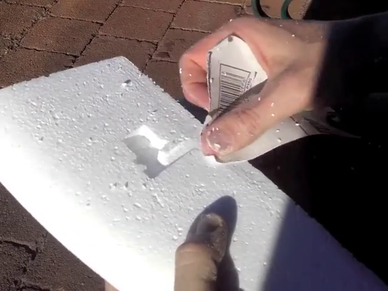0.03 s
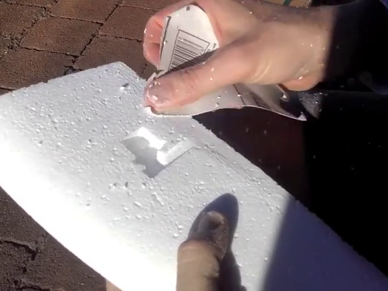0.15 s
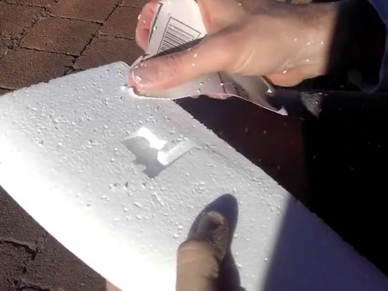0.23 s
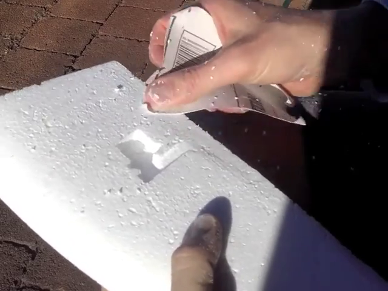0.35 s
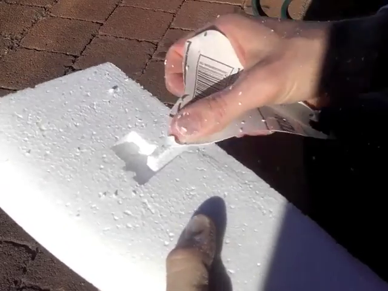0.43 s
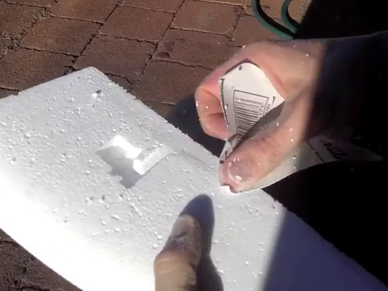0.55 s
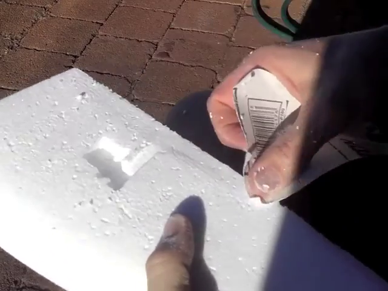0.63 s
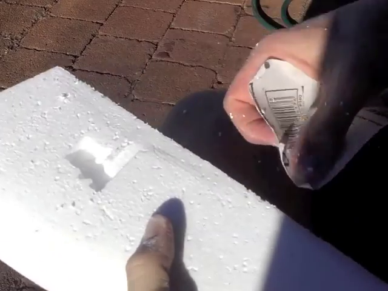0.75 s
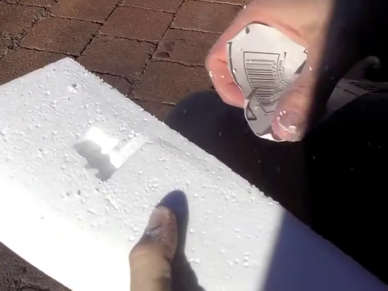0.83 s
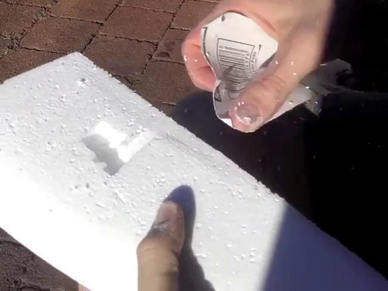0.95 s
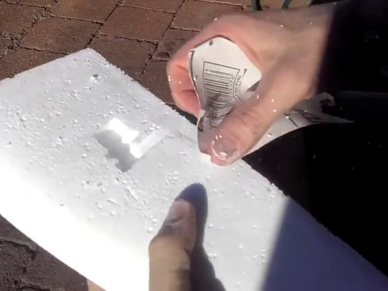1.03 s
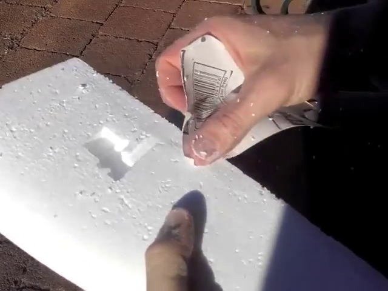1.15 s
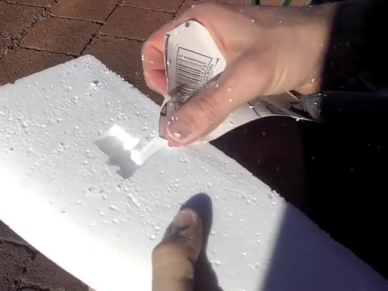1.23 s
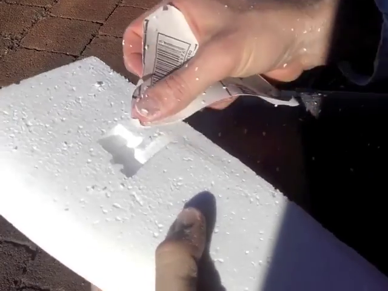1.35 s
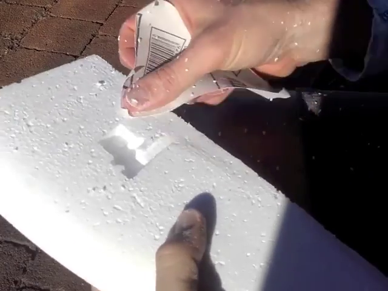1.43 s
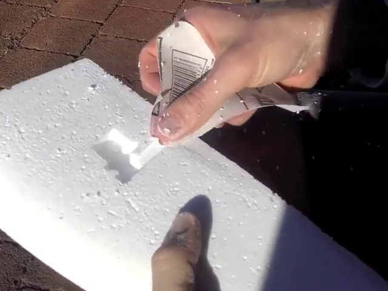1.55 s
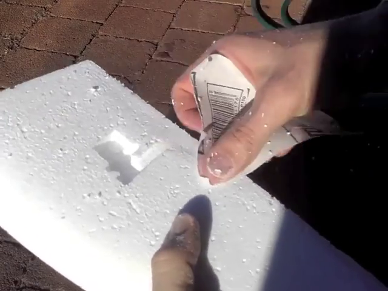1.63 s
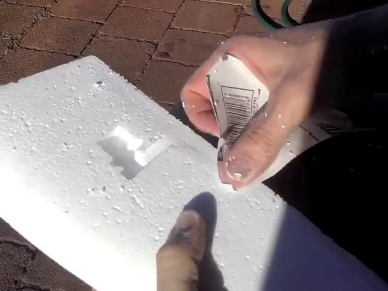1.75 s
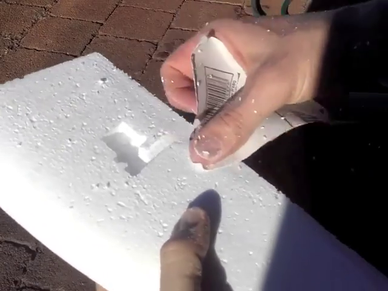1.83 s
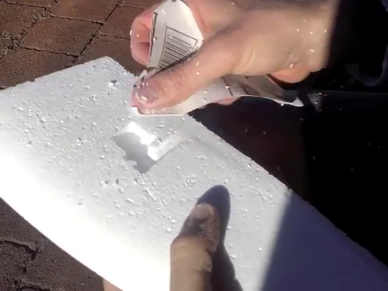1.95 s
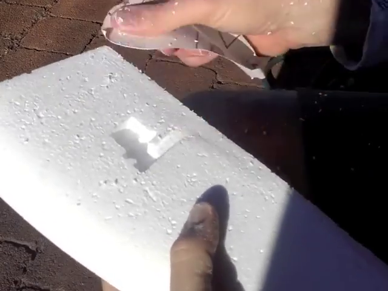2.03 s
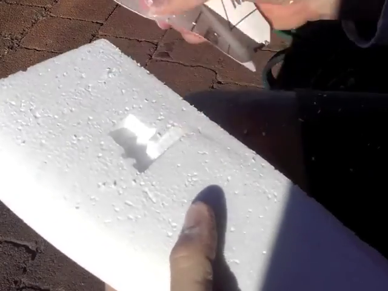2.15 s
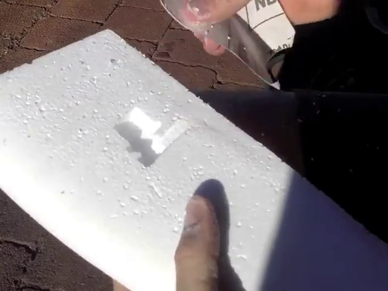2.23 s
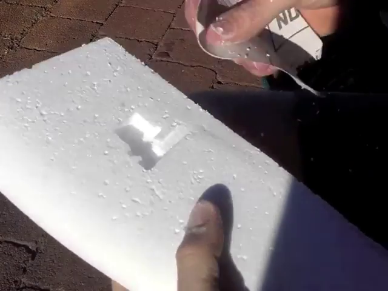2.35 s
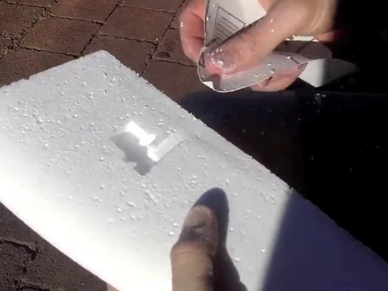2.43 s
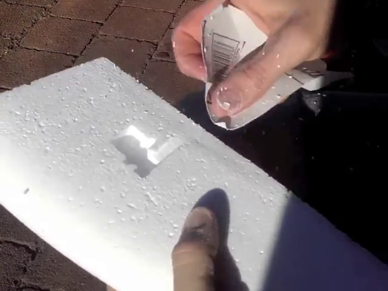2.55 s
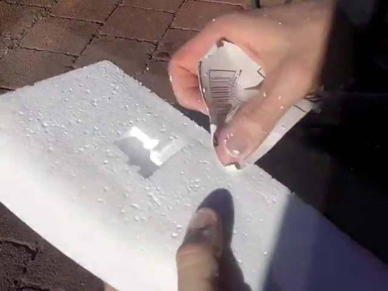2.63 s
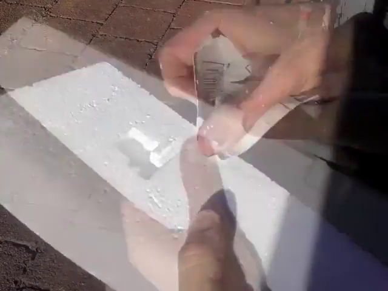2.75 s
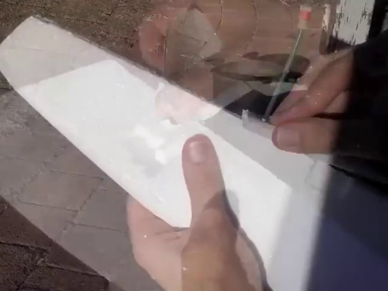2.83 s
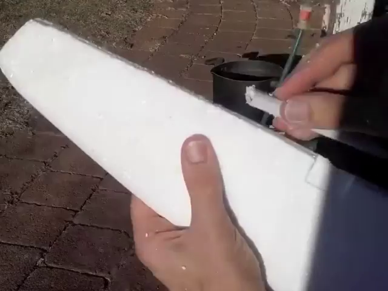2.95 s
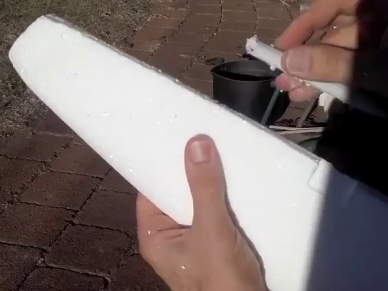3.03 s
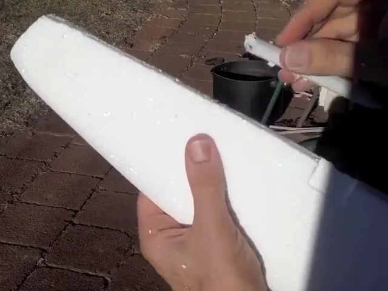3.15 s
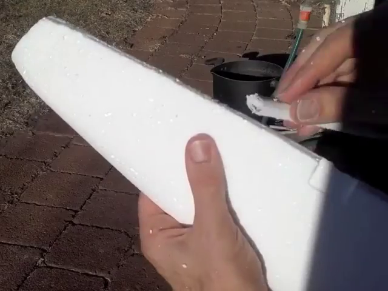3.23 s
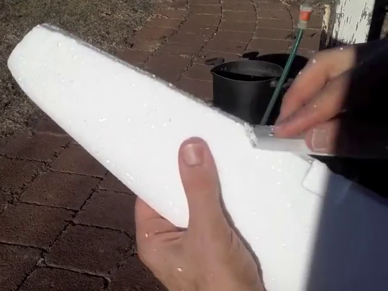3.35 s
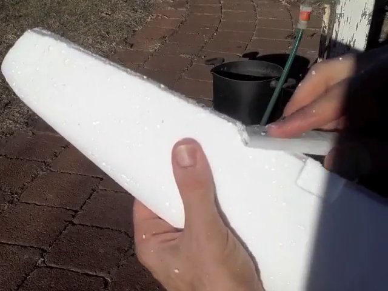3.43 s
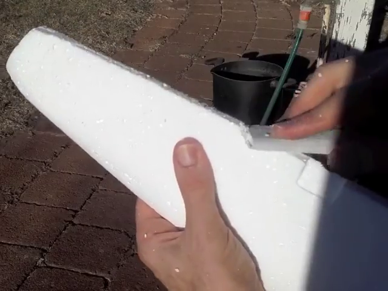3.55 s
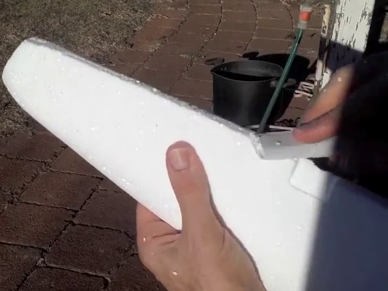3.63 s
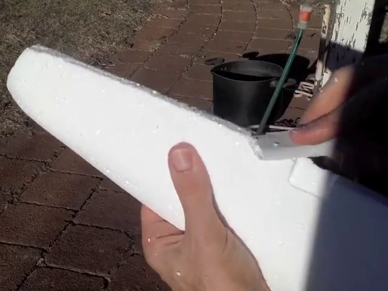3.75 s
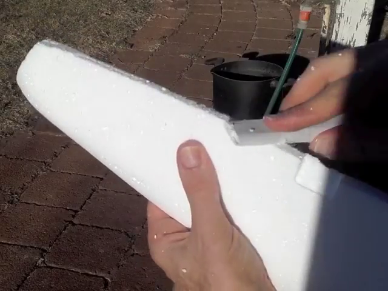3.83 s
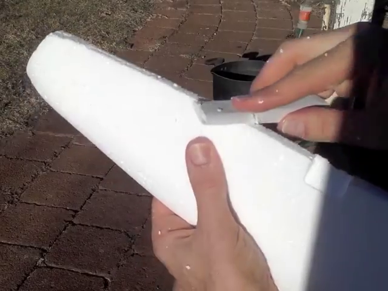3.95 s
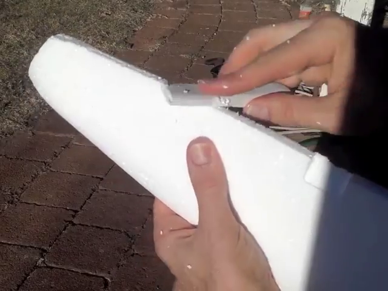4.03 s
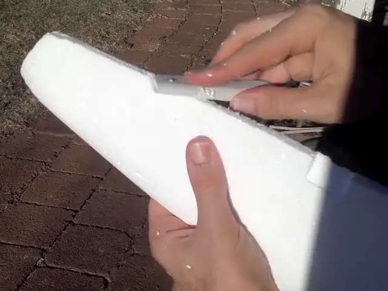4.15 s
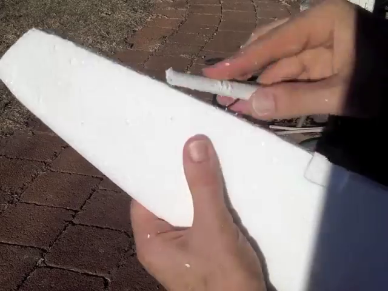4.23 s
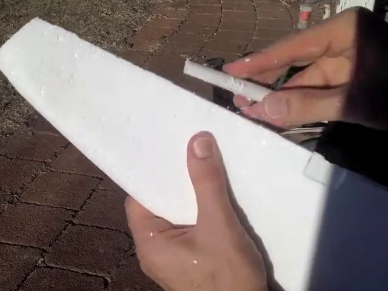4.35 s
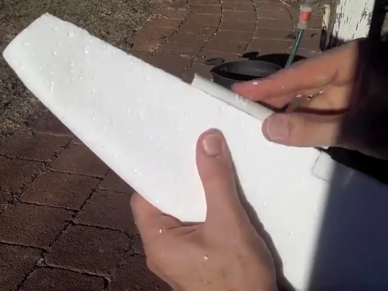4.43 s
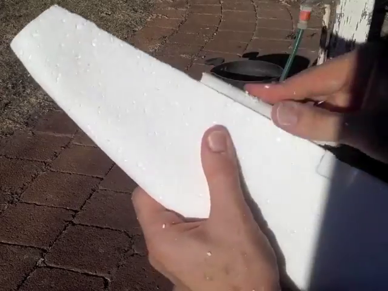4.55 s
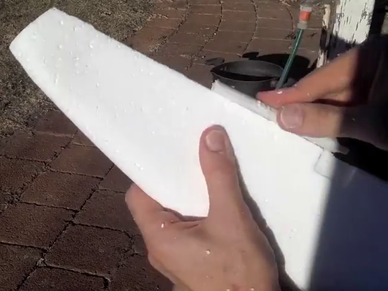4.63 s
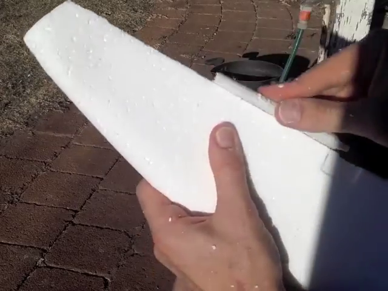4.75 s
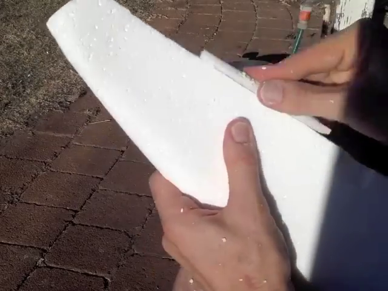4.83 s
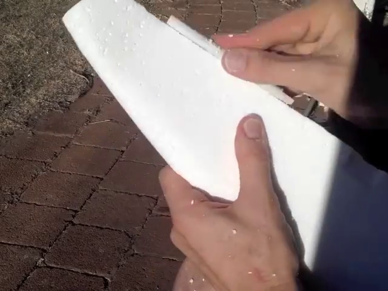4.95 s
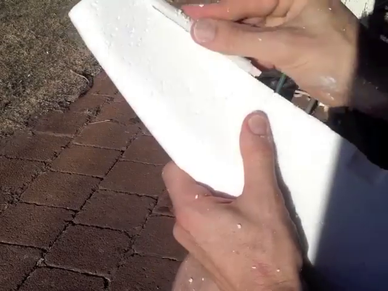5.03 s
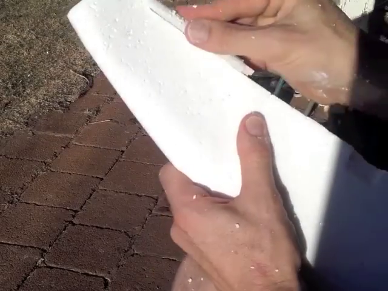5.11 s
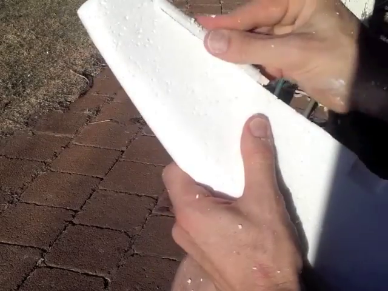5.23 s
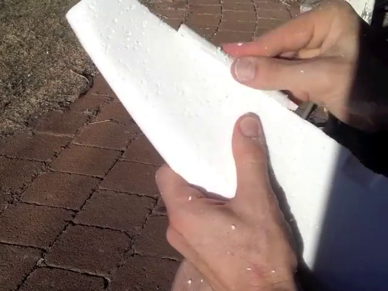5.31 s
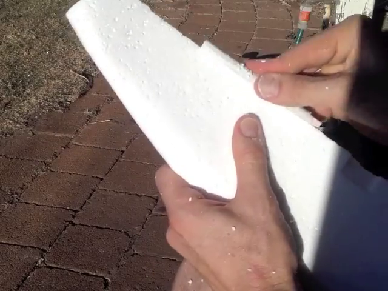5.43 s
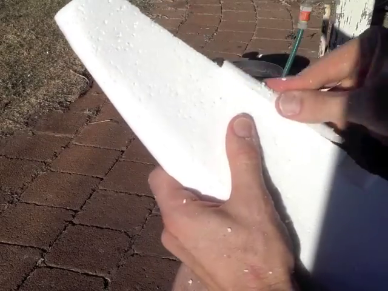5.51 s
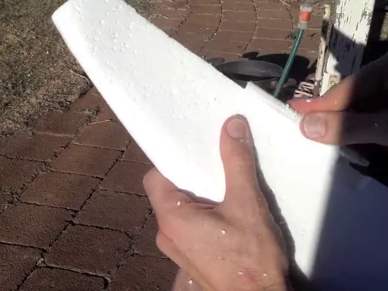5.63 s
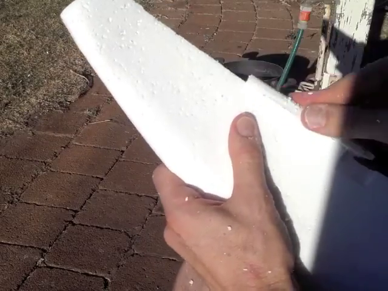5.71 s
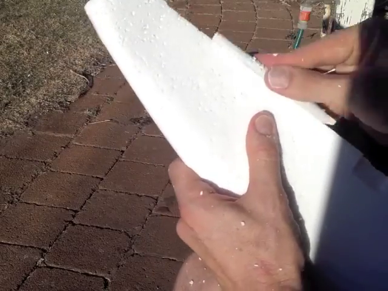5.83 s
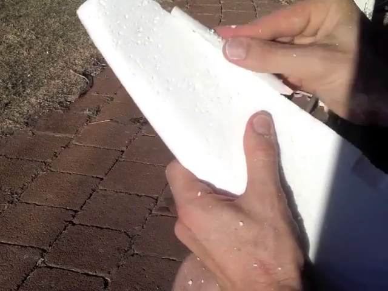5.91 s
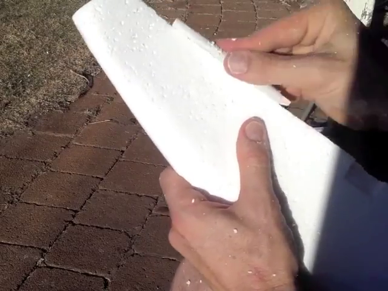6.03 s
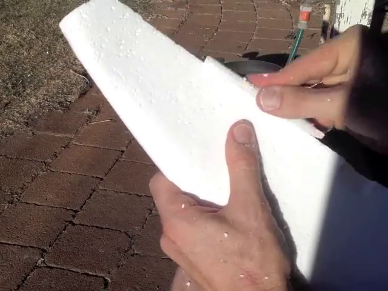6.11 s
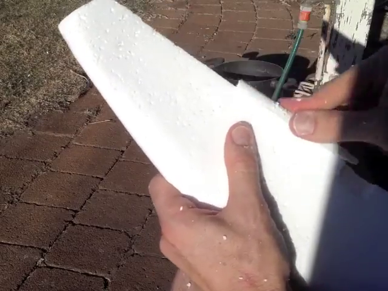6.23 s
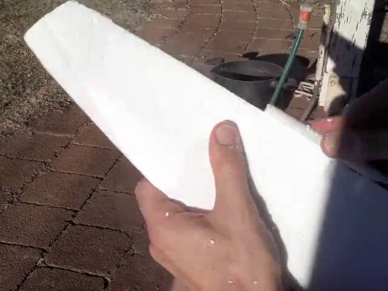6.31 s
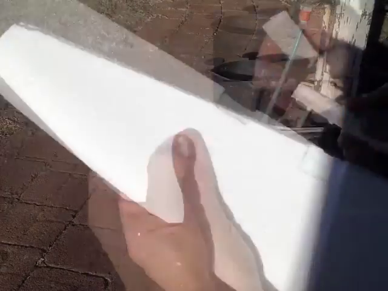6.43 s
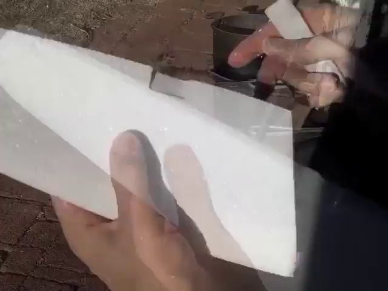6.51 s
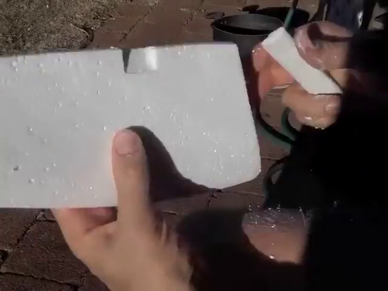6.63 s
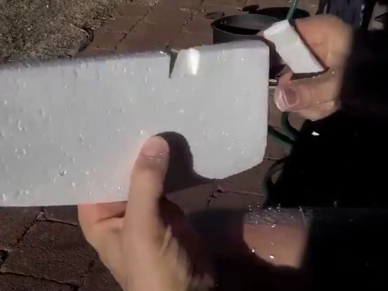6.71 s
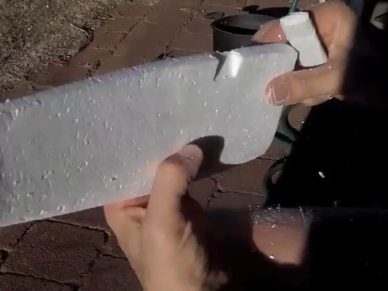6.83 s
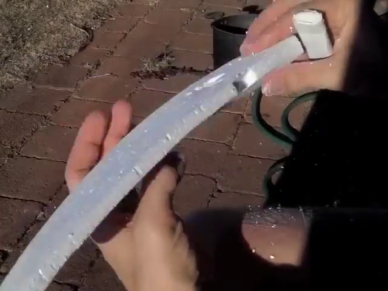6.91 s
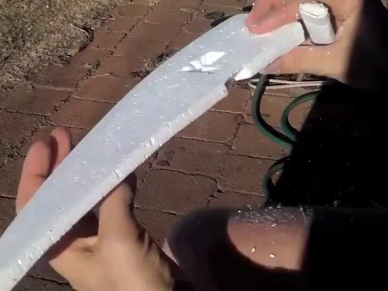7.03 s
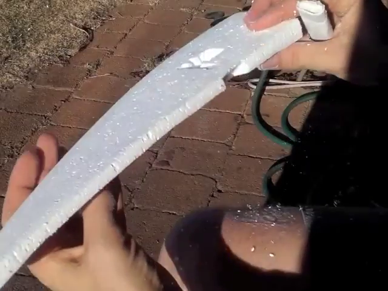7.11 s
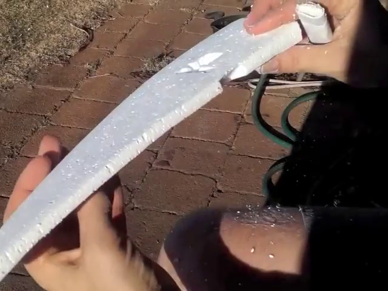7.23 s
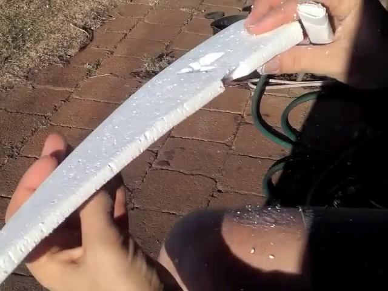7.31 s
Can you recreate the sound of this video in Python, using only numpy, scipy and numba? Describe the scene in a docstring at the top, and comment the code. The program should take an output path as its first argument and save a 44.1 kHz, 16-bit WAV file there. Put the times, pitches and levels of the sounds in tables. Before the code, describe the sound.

Close, dry outdoor hand-sanding of foam: bright gritty swishes, brief pauses with papery rustles, a sharp crack, steady edge rasps, then faint handling bumps.

```python
"""Hand-sanding a foam model wing

Close and dry outdoors: a fingertip wrapped in paper, then a paper roll dabbing near the wing root and
stroking along the edge. Each rasp is coloured noise with a peak that follows hand speed, through fixed
resonances and shifting echoes. Softer noise and crease ticks make the brushing; low resonant noise is
the wing's rumble, decaying sines are its bumps, sharp cracks are snagged grit; faint noise is the air."""
import sys
import numpy as np
from scipy import signal
from scipy.fft import rfft, irfft, next_fast_len
from scipy.io import wavfile
from scipy.ndimage import uniform_filter1d
from numba import njit

SR = 44100
rng = np.random.default_rng(int(sys.argv[2]) if len(sys.argv) > 2 else 0)


def dump(signal):
    """Clip the signal to [-1, 1] and save it as 16-bit WAV at the path in sys.argv[1]."""
    limited = np.clip(np.atleast_2d(signal).T, -1, 1)
    pcm = np.round(limited * 32767).astype(np.int16)
    wavfile.write(sys.argv[1], SR, pcm)


N = 325325


def from_db(db):
    """Decibels to gain."""
    return 10 ** (np.asarray(db) / 20)


def rms(x):
    """Root mean square."""
    return np.sqrt(np.mean(x ** 2) + 1e-20)


def cut(x, hz, kind, order=4):
    """Butterworth filter."""
    return signal.sosfilt(signal.butter(order, hz, kind, fs=SR, output="sos"), x)


def noise(spectrum):
    """Noise with a given colour, rms 1."""
    hz, level_db = np.transpose(spectrum)
    size = next_fast_len(N)
    bins = np.maximum(np.fft.rfftfreq(size, 1 / SR), 1)
    colour = from_db(np.interp(np.log(bins), np.log(hz), level_db))
    white = rng.standard_normal(size)
    coloured = irfft(rfft(white) * colour, size)[:N]
    return coloured / rms(coloured)


def drift(rate_hz):
    """Slow random wander below a given rate, rms 1."""
    slow = cut(rng.standard_normal(N + SR), rate_hz, "low", order=2)[SR:]   # skip the filter's start
    return slow / rms(slow)


def evened(x):
    """The same sound with its slow level held at 1."""
    power = np.abs(uniform_filter1d(x ** 2, size=1500))
    return x / np.sqrt(power + 1e-12)


def resonate(x, modes):
    """A chain of resonant peaks and antiresonant notches."""
    sections = []
    for hz, width_hz, level_db in modes:
        w = 2 * np.pi * hz / SR
        height = from_db(level_db / 2)
        damping = np.tan(np.pi * width_hz / SR)
        b = np.array([1 + damping * height, -2 * np.cos(w), 1 - damping * height])
        a = np.array([1 + damping / height, -2 * np.cos(w), 1 - damping / height])
        sections.append(np.r_[b, a] / a[0])
    return signal.sosfilt(sections, x)


@njit
def moving_band(x, slope, damping):
    """State-variable band-pass with gain 1 at a moving centre; slope = tan(pi Hz / SR)."""
    out, band, low = np.zeros(len(x)), 0.0, 0.0
    for i in range(len(x)):
        g = slope[i]
        v = (band + g * (x[i] - low)) / (1 + g * (g + damping))
        band, low = 2 * v - band, low + 2 * g * v
        out[i] = damping * v
    return out


def ring(clicks, hz, t60):
    """A unit click sets a sine ringing that starts near height 1 and falls 60 dB in t60 seconds."""
    r = from_db(-60 / (t60 * SR))
    w = 2 * np.pi * hz / SR
    return signal.lfilter([0, np.sin(w)], [1, -2 * r * np.cos(w), r * r], clicks + 1e-18)


def strikes(rows, scatter_db):
    """One click for each (time, level) row, each a little stronger or weaker."""
    s, level_db = np.transpose(rows)
    clicks = np.zeros(N)
    clicks[np.round(s * SR).astype(int)] = from_db(level_db + scatter_db * rng.standard_normal(len(s)))
    return clicks


def envelope(start, end, attack, release):
    """Smooth attack, hold and release of one contact (0-1)."""
    t = np.arange(N) / SR
    ramp = np.clip(np.minimum((t - start) / attack, (end - t) / release), 0, 1)
    return ramp * ramp * (3 - 2 * ramp)


def blend(contacts):
    """Contacts (gain, controls..) add in power; where they overlap the stronger one dominates the controls."""
    gains, *controls = [np.array(column) for column in zip(*contacts)]
    power = gains ** 2
    weights = power + 1e-20
    blended = [(weights * control).sum(0) / weights.sum(0) for control in controls]
    return [np.sqrt(power.sum(0))] + blended


def with_hiss(friction, hiss_db, split_hz=6000):
    """Friction at level 1 below the split, with the hiss above it set on its own."""
    body = evened(cut(friction, split_hz, "low", order=5))
    hiss = evened(cut(friction, split_hz, "high", order=5))
    return body + from_db(hiss_db) * hiss


# Still outdoor air, relative spectrum: (frequency [Hz], level [dB])
AIR_COLOUR = [(18, -29), (30, 1), (49, -18), (66, -31.5), (152, -1.5), (1140, -7.5), (1640, -20),
              (1820, -8), (2760, -19.5), (15500, -28.5)]
AIR_DB = -67


def still_air():
    """A steady bed of coloured noise stands for the quiet outdoor air."""
    return from_db(AIR_DB) * noise(AIR_COLOUR)


RUMBLE_PER_RASP = .3   # dB of wing rumble for each dB of rasp


def shaking(rasp, coupling_db):
    """How hard a run of strokes shakes the wing: it grows far more slowly than the rasp."""
    return from_db(coupling_db) * rasp ** RUMBLE_PER_RASP


# Rumble from the hand that holds and turns the wing, before trim: (time [s], level [dB])
HOLDING = [(0, -57.5), (.8, -58), (1.0, -62), (2.55, -56.5), (3.05, -68), (3.55, -65.5), (4.4, -63.5),
           (5.2, -57), (5.75, -53), (6.5, -59), (6.95, -52.5), (7.17, -58), (7.38, -54.5)]
# Colour of the wing's rumble, relative: (frequency [Hz], level [dB])
WING_COLOUR = [(45, -34), (64, -18.5), (100, -15), (140, -7.5), (180, -5), (250, -4.5), (330, -5),
               (500, -2.5), (890, -2), (1590, -8.5), (2250, -16), (3400, -20.5), (6000, -28), (12000, -31)]
# Lowest bending resonances of the held wing: (frequency [Hz], width [Hz], gain [dB])
WING_BENDING = [(176.5, 17, 0), (215, 20, 3.5)]


def handling(drives, lumpy_db=1.77, trim_db=-1.44):
    """Holding and rubbing set the whole light wing rumbling, their drives adding in power."""
    holding_s, holding_db = np.transpose(HOLDING)
    holding = from_db(np.interp(np.arange(N) / SR, holding_s, holding_db))
    level = np.sqrt(holding ** 2 + sum(drive ** 2 for drive in drives))
    rumble = resonate(noise(WING_COLOUR), WING_BENDING)
    rumble = rumble / rms(cut(rumble, [100, 700], "band"))
    return level * from_db(trim_db + lumpy_db * drift(45)) * rumble


# Fingers bumping the wing, strength before random scatter: (time [s], level [dB])
BUMPS = [(1.105, -37.5), (2.143, -44), (2.217, -56), (6.675, -43), (6.853, -56), (6.875, -30.5),
         (7.038, -38)]
# What the bumped wing rings with: (frequency [Hz], relative level [dB], 60 dB decay [s])
WING_MODES = [(194, -7, 0.055), (270, -13, 0.087), (420, -9, .04), (700, -7, 0.037), (1060, -4.5, 0.024),
              (1410, -12, 0.013), (2120, -4.5, 0.01)]


def bumps():
    """Each touch strikes every mode of the wing with a strength of its own."""
    knocks = 0
    for hz, level_db, t60 in WING_MODES:
        knocks = knocks + from_db(level_db) * ring(strikes(BUMPS, scatter_db=3.5), hz, t60)
    return cut(knocks, 200, "high", order=2)   # small light things radiate little bass


# Grit snagging and paper ticking, click strength before scatter and filters: (time [s], level [dB])
SNAPS = [(1.1065, -38), (1.216, -27), (1.871, -24), (4.0794, -9.5), (6.676, -37), (6.768, -31)]


def snaps():
    """A snagged grain lets go with one sharp crack and a few milliseconds of splintering."""
    clicks = strikes(SNAPS, scatter_db=.3)
    crack = -1.5 * ring(clicks, 8000, .0004)
    t = np.arange(SR // 30) / SR
    decay = from_db(-16 - 60 * t / .009)   # 60 dB down in 9 ms
    splinters = cut(rng.standard_normal(len(t)), 2500, "high", order=1) * decay
    snap = crack + signal.fftconvolve(clicks, splinters)[:N]
    return cut(snap, 700, "high", order=2)   # little bass here either


# Delays of the reflections between paper, hand and wing: (delay [s])
HAND_ECHOES = [.0007, .0011, .0016, .0023, .0031, .0042, .0056]
LOOSE_FLEX, ROLL_FLEX = .17, .11   # echo depth (0-1): loosely held paper, firmly pressed roll


def shifting_echoes(x, depth):
    """Close reflections come and go as the hand travels and the paper flexes, so peaks wander."""
    out = x.copy()
    for delay_s in HAND_ECHOES:
        out += depth * drift(6) * np.roll(x, round(delay_s * SR))
    return out


# What a crease rings with: (frequency [Hz], 60 dB decay [s])
CREASE_MODES = [(1170, 0.0058), (1930, 0.0036), (3000, 0.0024), (4600, 0.0022)]
CREASES_PER_S, CREASE_SPREAD_DB = 90, 8   # mean rate, spread of sizes


def creases():
    """Flexing paper ticks sparsely: random clicks of mixed size ring short modes, rms 1."""
    size_db = CREASE_SPREAD_DB * np.minimum(rng.exponential(1, N), 3)
    sizes = from_db(size_db) * rng.choice([-1, 1], N)
    clicks = sizes * (rng.random(N) < CREASES_PER_S / SR)
    ticks = sum((-1) ** k * ring(clicks, hz, t60) for k, (hz, t60) in enumerate(CREASE_MODES))
    return ticks / rms(ticks)


# Loose paper and skin brushing lightly, levels before trim:
# (start [s], end [s], swish [dB], hiss relative to swish [dB], wing rumble [dB])
BRUSHES = [(.797, 0.828, -52.5, -13, -58), (1.099, 1.162, -55, -16, -51), (2.079, 2.135, -57, -20, -48.5),
           (2.127, 2.171, -50, -11, -50), (2.2, 2.251, -48, -10, -50), (2.238, 2.484, -47.5, -13.5, -49.5),
           (2.454, 2.53, -47, -11, -54), (2.629, 2.75, -51, -3, -61), (3.028, 3.093, -54.5, -9, -73),
           (6.528, 6.595, -54, -3, -61), (6.761, 6.792, -45.5, 0.5, -47.5), (6.824, 6.881, -45, -6, -52),
           (6.867, 6.903, -44, -12, -51), (6.9, 6.968, -58, -6, -58), (6.949, 7.056, -51, -5.5, -52),
           (7.051, 7.103, -49.5, -7, -52), (7.087, 7.135, -55, -8, -57), (7.228, 7.252, -61, -12, -58),
           (7.292, 7.37, -62, -12, -56.5)]
BRUSH_ATTACK_S, BRUSH_RELEASE_S = 0.011, 0.027


def light_touches():
    """Each brush rises quickly and fades: gain of its swish, its hiss (dB), gain of its rumble."""
    contacts, rumble = [], 0
    for start, end, swish_db, hiss_db, rumble_db in BRUSHES:
        shape = envelope(start, end, BRUSH_ATTACK_S, BRUSH_RELEASE_S)
        contacts.append((from_db(swish_db) * shape, np.full(N, hiss_db)))
        rumble = rumble + from_db(rumble_db) * shape
    return blend(contacts) + [rumble]


# Colour of the brushing, relative: (frequency [Hz], level [dB])
BRUSH_COLOUR = [(530, -37), (900, -14), (1170, 4), (1330, -6), (1930, 0), (2480, -10.5), (3000, -3.5),
                (3260, -12), (3540, -5.5), (6650, -18.5), (15500, -27)]
CREASE_DB = -3.5   # creases against the swish noise


def brushing(crinkle_db=0.5, trim_db=-2):
    """A light, uneven swish of paper and skin with no pressure behind it, and its drive on the wing."""
    level, hiss_db, wing_drive = light_touches()
    crinkle = from_db(crinkle_db * drift(114))
    swish = shifting_echoes(noise(BRUSH_COLOUR), LOOSE_FLEX) + from_db(CREASE_DB) * creases()
    return level * from_db(trim_db) * crinkle * with_hiss(swish, hiss_db), wing_drive


# The rubbed place passes the nodal line of a thin panel: (time [s], half width [s], nearness [0-1])
NODE_CROSSINGS = [(.11, 0.066, 0.9), (.59, 0.054, 1), (1.26, 0.11, 0.67), (1.68, 0.068, 0.7),
                  (1.91, 0.059, 0.92), (6.35, 0.074, 0.14)]
# Bands in which the panel rings:
# (low edge [Hz], high edge [Hz], level away from the line [dB], change on the line [dB])
PANEL_BANDS = [(1200, 1860, 3.5, -10), (2860, 3450, -1, 9.5), (3800, 3900, 1.5, -11)]


def panel(x):
    """On the thin panel's nodal line its boom dies and a brighter ring takes over."""
    t = np.arange(N) / SR
    on_line = sum(nearness * np.exp(-((t - s) / half_s) ** 2) for s, half_s, nearness in NODE_CROSSINGS)
    for low_hz, high_hz, away_db, change_db in PANEL_BANDS:
        band_gain = from_db(away_db + change_db * on_line)
        x = x + (band_gain - 1) * cut(x, [low_hz, high_hz], "band", order=1)
    return x


DRAG_S, DRAG_DB = 0.052, -21   # light drag before each stroke bites: how long, how much quieter
RASP_PER_SPEED, HISS_PER_SPEED = 1.0, 0.65   # dB of rasp, and of hiss over it, per dB of hand speed
SPEED_CURVE = 1.3   # arch of the speed: 1 is pointed, 2 is round


def stroking(strokes):
    """The hand speeds up and slows down in each stroke; rasp, contact rate and hiss follow its speed."""
    t, contacts = np.arange(N) / SR, []
    for start, end, rasp_db, attack, release, fastest, slowing, contact_hz, hiss_db in strokes:
        # 0 where the hand is fastest, -1 and 1 at the ends
        away = np.interp(t, start + (end - start) * np.array([0, fastest, 1]), [-1, 0, 1])
        speed = 1 - slowing * np.abs(away) ** SPEED_CURVE
        bite = envelope(start, end, attack, release)
        drag = from_db(DRAG_DB) * envelope(start - DRAG_S, end, DRAG_S, release)
        rasp = from_db(rasp_db) * np.maximum(bite, drag) * speed ** RASP_PER_SPEED
        contacts.append((rasp, contact_hz * speed, hiss_db + HISS_PER_SPEED * 20 * np.log10(speed)))
    return blend(contacts)


def sanding(motion, grit, modes, focus, damping, judder_db, trim_db, flex):
    """Grit noise swells around the contact rate, which follows the hand's speed across fixed resonances."""
    rasp, contact_hz, hiss_db = motion
    friction = noise(grit)
    contact_hz = np.clip(contact_hz * np.exp(.06 * drift(40)), 300, 9000)   # the hand never moves evenly
    friction = friction + focus * moving_band(friction, np.tan(np.pi * contact_hz / SR), damping)
    radiated = shifting_echoes(panel(resonate(friction, modes)), flex)
    judder = from_db(judder_db * drift(74))   # the paper catches on the beads of the foam
    return rasp * from_db(trim_db) * judder * with_hiss(radiated, hiss_db)


# Short dabs with the roll near the wing root, levels before trim, rate before wander:
# (start [s], end [s], rasp [dB], attack [s], release [s], fastest point [share of length],
#  speed lost at the ends [share], top rate of grit contacts [Hz], foam hiss relative to rasp [dB])
ROOT_STROKES = [(3.35, 3.38, -50, 0.0044, 0.013, .4, 0.13, 1420, -9.5),
                (3.465, 3.518, -43.5, 0.017, 0.021, 0.46, 0.17, 1840, -4),
                (3.594, 3.619, -46, 0.0064, 0.0089, .4, 0.11, 1300, -11),
                (3.618, 3.742, -40.5, 0.012, 0.04, 0.3, 0.35, 2900, -5.5),
                (3.832, 4.2, -34, 0.035, 0.066, 0.22, 0.14, 2580, -3.5),
                (4.207, 4.251, -37, 0.0074, 0.012, .3, 0.12, 1560, -19),
                (4.25, 4.305, -41, 0.0051, .018, 0.43, 0.13, 1420, -9.5),
                (4.535, 4.573, -42, 0.016, 0.017, 0.44, 0.2, 1660, -7.5),
                (4.641, 4.738, -40, 0.0061, .025, 0.24, 0.31, 1800, -5.5)]
# Friction spectrum, relative: (frequency [Hz], level [dB])
ROOT_GRIT = [(150, -52), (300, -3.5), (550, -9), (850, 6), (1500, -5.5), (2500, 3.5), (4500, 2),
             (6500, -14), (8500, -17), (11500, -19), (15500, -27)]
# Peaks (+) and notches (-) of paper and wing: (frequency [Hz], width [Hz], gain [dB])
ROOT_MODES = [(447, 170, 11.5), (1170, 140, 7.5), (1360, 150, -11), (1714, 190, 7), (2420, 170, -10),
              (2810, 230, -7), (3360, 200, -1.5), (3840, 160, 0.5), (4570, 280, -8), (6610, 370, 7.5),
              (6800, 440, -8), (9250, 200, -5), (10500, 320, 6)]


def root_sanding():
    """The paper roll dabs the wing root with strong judder, its paper flexing loosely: its rasp and its drive
    on the wing."""
    motion = stroking(ROOT_STROKES)
    sound = sanding(motion, ROOT_GRIT, ROOT_MODES, focus=2.3, damping=1.0,
                    judder_db=2.08, trim_db=-3.44, flex=LOOSE_FLEX)
    return sound, shaking(motion[0], coupling_db=-41.5)


# Long strokes with the roll along the edge, levels before trim, rate before wander:
# (start [s], end [s], rasp [dB], attack [s], release [s], fastest point [share of length],
#  speed lost at the ends [share], top rate of grit contacts [Hz], foam hiss relative to rasp [dB])
EDGE_STROKES = [(4.778, 5.172, -35.5, 0.023, 0.039, 0.57, 0.64, 2550, -4),
                (5.263, 5.415, -34, 0.0073, .05, .35, .2, 2600, -5),
                (5.37, 5.53, -37.5, 0.031, 0.03, 0.28, 0.37, 2100, -5),
                (5.485, 5.718, -34.5, 0.051, 0.048, 0.46, 0.34, 2530, -6),
                (5.773, 6.018, -33.5, 0.0089, 0.065, 0.25, 0.38, 2300, -6.5),
                (6.069, 6.44, -34, 0.024, .035, 0.17, 0.23, 2520, -6.5)]
# Friction spectrum, relative: (frequency [Hz], level [dB])
EDGE_GRIT = [(150, -50), (300, -15), (550, -16.5), (850, -2.5), (1500, -5.5), (2500, -0.5), (4500, -0.5),
             (6500, -6.5), (8500, -8), (11500, -10.5), (15500, -20.5)]
# Peaks (+) and notches (-) of paper and wing: (frequency [Hz], width [Hz], gain [dB])
EDGE_MODES = [(450, 94, 7), (763, 200, 10), (1099, 180, 8), (1590, 98, -3), (1840, 240, 6),
              (2200, 130, 5.5), (2440, 210, -4), (2950, 400, 5), (3300, 220, -5.5), (4360, 58, 4),
              (4970, 92, 5), (5240, 190, 2), (5850, 380, 4), (9250, 400, -2.9)]


def edge_sanding():
    """A firmly pressed roll rasps along the edge: its sound and its drive on the wing."""
    motion = stroking(EDGE_STROKES)
    sound = sanding(motion, EDGE_GRIT, EDGE_MODES, focus=0.4, damping=0.82,
                    judder_db=0.5, trim_db=0.64, flex=ROLL_FLEX)
    return sound, shaking(motion[0], coupling_db=-38.5)


# Strokes with paper round the fingertip, levels before trim, rate before wander:
# (start [s], end [s], rasp [dB], attack [s], release [s], fastest point [share of length],
#  speed lost at the ends [share], top rate of grit contacts [Hz], foam hiss relative to rasp [dB])
FINGER_STROKES = [(.038, .344, -27.5, 0.028, 0.044, 0.29, 0.47, 3230, -7.5),
                  (.384, .732, -27, 0.015, 0.034, 0.38, 0.51, 2970, -6.5),
                  (1.128, 1.215, -41.5, 0.034, 0.015, 0.42, 0.14, 2620, -11.5),
                  (1.19, 1.415, -30, 0.058, 0.063, 0.46, 0.46, 3340, -7),
                  (1.375, 1.492, -30.5, 0.013, 0.057, 0.57, 0.24, 2440, -10),
                  (1.529, 1.785, -28, 0.029, 0.05, 0.44, 0.47, 3320, -7),
                  (1.848, 2.1, -26, 0.033, 0.068, .45, 0.34, 3320, -7.5),
                  (2.665, 2.982, -36.5, 0.11, 0.043, 0.58, 0.7, 4030, -5.5)]
# Friction spectrum, relative: (frequency [Hz], level [dB])
FINGER_GRIT = [(150, -45.5), (300, -27.5), (550, -10.5), (850, -3.5), (1500, -1.5), (2500, -4.5), (4500, 0),
               (6500, -6), (8500, -7.5), (11500, -11), (15500, -15)]
# Peaks (+) and notches (-) of paper and wing: (frequency [Hz], width [Hz], gain [dB])
FINGER_MODES = [(1070, 230, 3.5), (1720, 180, -3), (1970, 80, 6.5), (2274, 180, 5.5), (2640, 170, 1),
                (3030, 230, 5.5), (3310, 66, -4), (3704, 65, 5), (4130, 250, 3.5), (4570, 130, 4.5),
                (4970, 170, -0.5), (5370, 220, 6), (5560, 350, -4.5), (6870, 270, 5), (9300, 290, -5),
                (10260, 500, 3), (13100, 1900, 1.5)]


def fingertip_sanding():
    """Paper wrapped round a fingertip rasps loudest: its sound and its drive on the wing."""
    motion = stroking(FINGER_STROKES)
    sound = sanding(motion, FINGER_GRIT, FINGER_MODES, focus=1.75, damping=1.0,
                    judder_db=0.52, trim_db=-0.91, flex=LOOSE_FLEX)
    return sound, shaking(motion[0], coupling_db=-41.0)


def scene():
    """All sources reach one microphone; both channels carry the same sound."""
    brush, brush_drive = brushing()
    root, root_drive = root_sanding()
    edge, edge_drive = edge_sanding()
    finger, finger_drive = fingertip_sanding()
    rumble = handling([finger_drive, root_drive, edge_drive, brush_drive])
    mono = still_air() + rumble + bumps() + snaps() + brush + root + edge + finger
    return np.stack([mono, mono])


MIC_LOW_CUT_HZ, CUTOFF_HZ = 99, 15900


def record(dry):
    """The small microphone loses the deep bass, the converter adds a slight offset, the top is cut steeply."""
    heard = cut(dry, MIC_LOW_CUT_HZ, "high", order=1)
    offset = -.0005
    steep = signal.ellip(12, .1, 80, CUTOFF_HZ, fs=SR, output="sos")   # .1 dB ripple, 80 dB stopband
    return offset + signal.sosfilt(steep, heard)


dry = scene()
out = record(dry)
dump(out)
```